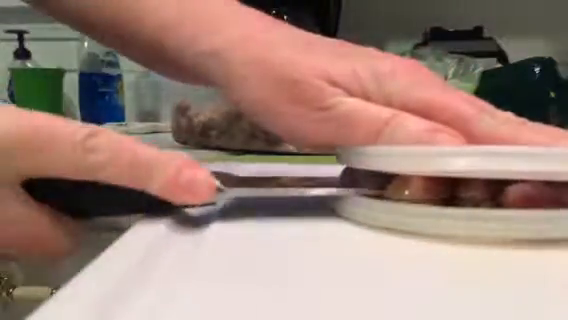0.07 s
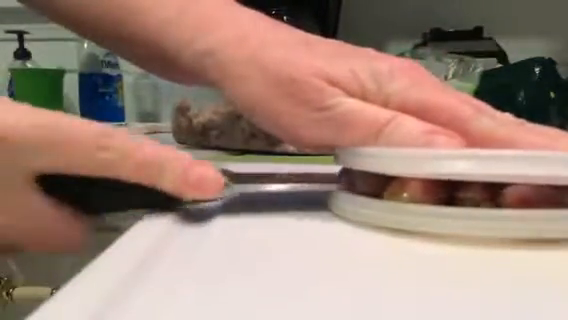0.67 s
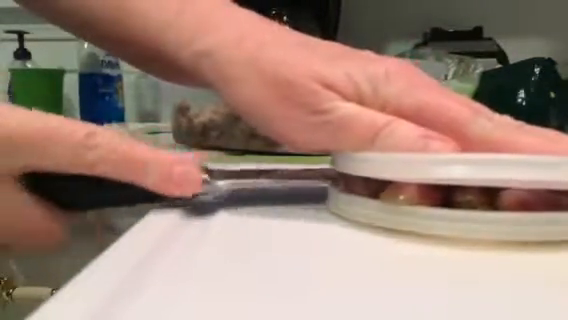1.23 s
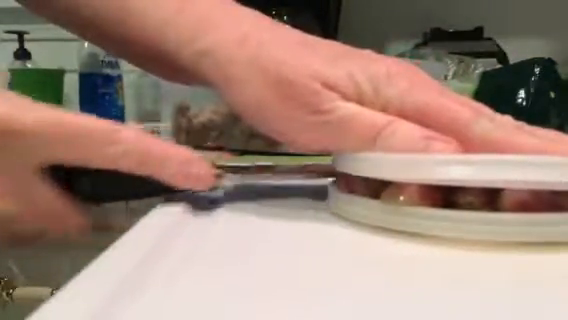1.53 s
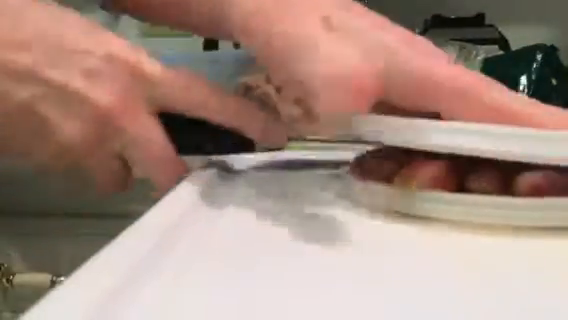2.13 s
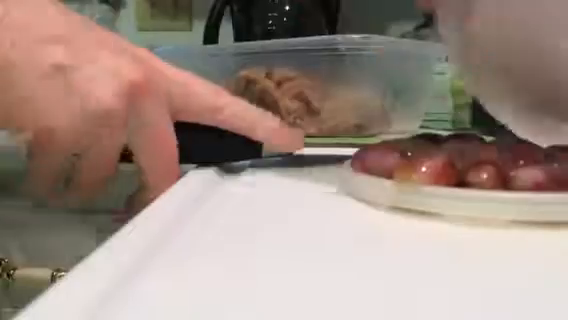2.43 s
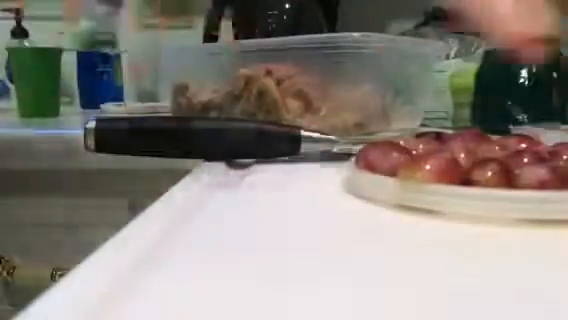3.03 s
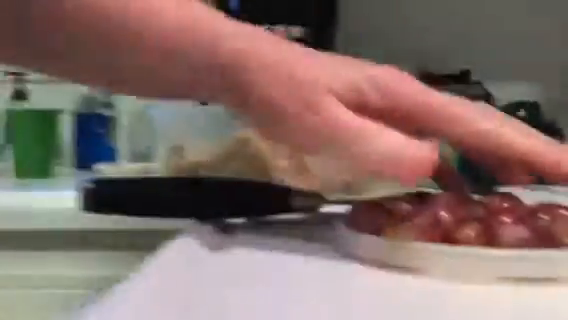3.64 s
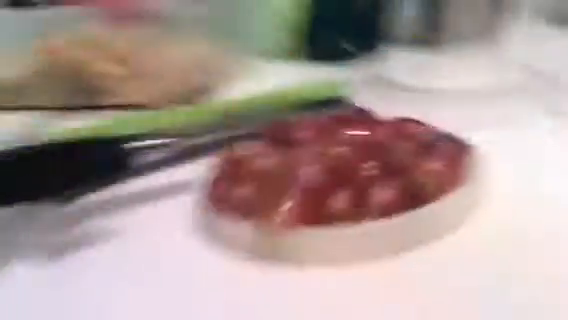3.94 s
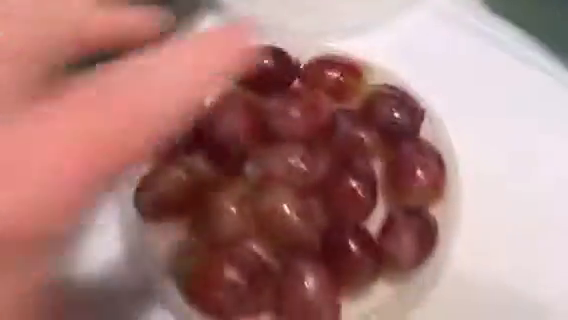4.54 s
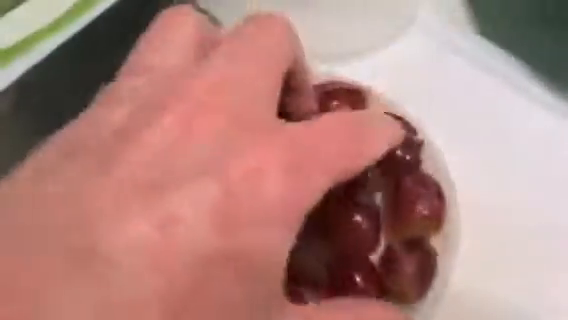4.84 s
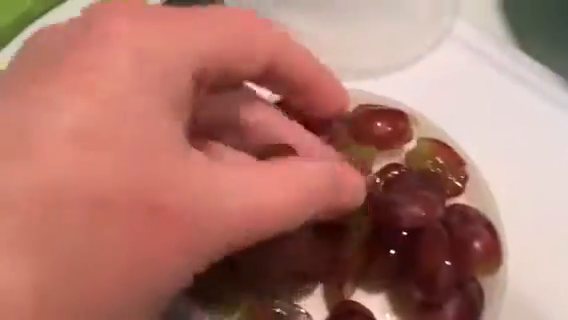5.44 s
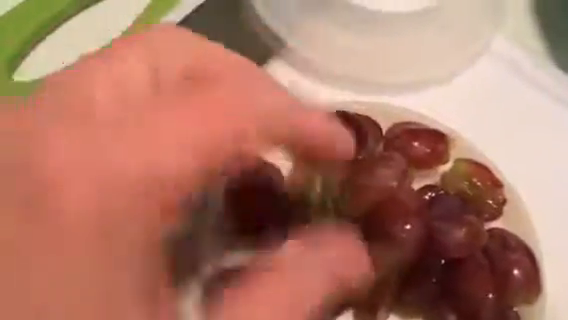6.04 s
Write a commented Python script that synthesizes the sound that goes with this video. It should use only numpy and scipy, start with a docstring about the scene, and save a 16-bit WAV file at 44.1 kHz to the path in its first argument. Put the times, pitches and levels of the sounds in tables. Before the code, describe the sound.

Close to the microphone in a small kitchen, a serrated knife saws quickly through grapes held between two plastic lids, hissing and rasping on the rims and bumping the cutting board. The blade snaps free and is laid down with a brief ring. The top lid clicks off, then drops with a loud rattle. Soft handling bumps and very faint wet squelches follow over a low fridge hum.

```python
"""In a kitchen, close to a phone, a serrated knife saws through grapes held between two plastic lids.
The teeth hiss and rasp on the rim, and most pushes bump the lids on the cutting board.
The blade comes free, rings and is laid down; the top lid is lifted off and dropped with a rattle.
Fingers then turn the wet halves over. The phone is picked up with soft bumps, and a fridge hums."""
import sys
import numpy as np
from scipy import signal
from scipy.fft import rfft, irfft, next_fast_len
from scipy.io import wavfile
from scipy.ndimage import uniform_filter1d

SR = 44100
rng = np.random.default_rng(int(sys.argv[2]) if len(sys.argv) > 2 else 0)


def generate_wav(signal):
    """Clip the signal to [-1, 1] and save it as 16-bit WAV at the path in sys.argv[1]."""
    frames = np.transpose(np.atleast_2d(signal))
    scaled = np.clip(frames, -1, 1) * 32767
    pcm = np.round(scaled).astype(np.int16)
    wavfile.write(sys.argv[1], SR, pcm)


N = 277389
TIME = np.arange(N) / SR

# tone colour of the kitchen air: pitch_hz, relative_db
AIR_COLOUR = [(15, -52.5), (25, -18.5), (43, -14), (86, -12.5), (133, -10.5), (169, -18), (246, -16),
              (274, -24), (2300, -36.5), (15500, -44.5)]
# tones of the fridge: pitch_hz, base_level_db
FRIDGE_TONES = [(58, -65), (119, -70), (138, -65), (241, -72)]
# how the hum changes as the phone turns: time_s, gain_db
FRIDGE_SWELL = [(0, -10), (4.2, -8.5), (5.3, 0), (5.52, 6), (6.2, -4)]
# saw strokes, push and pull in turn: start_s, level_db, rim_pressure_db
SAW_STROKES = [(.018, -33, -7.5), (.215, -33, -4), (.368, -30, -7), (.556, -34, -15.5), (.706, -31, -9.5),
               (.887, -33, -13.5), (1.038, -31, -5), (1.208, -37.5, -1.5), (1.353, -31.5, 0),
               (1.513, -37.5, -6), (1.648, -35, -6), (1.805, -43.5, -2)]
# tone colours of the cutting edge, the scraped rim and the lids: pitch_hz, relative_db
HISS_COLOUR = [(200, -31.5), (1000, -25), (3000, -15), (4500, 1), (6500, 5), (8400, 2), (10500, -6),
               (13000, -13.5), (15500, -23)]
RASP_COLOUR = [(1500, -32), (3100, -11.5), (3900, -3.5), (4600, -3), (5800, -16.5), (10000, -32)]
BODY_COLOUR = [(100, -23.5), (220, -9.5), (400, -16), (750, -4), (1150, -2), (1500, 3), (2000, 2.5),
               (2800, -2), (5000, -23), (10000, -45)]
# the rim squeaks on some pulls: start_s, length_s, level_db, first_pitch_hz
RIM_SQUEAKS = [(0.239, 0.08, -37, 639.3), (.561, 0.073, -45.5, 518)]
# dull blows on the board and counter: start_s, level_db, hardness_db
BOARD_BLOWS = [(.483, -33, -10.5), (.800, -33.5, -6), (1.126, -30.5, -8), (1.420, -33.5, -1),
               (1.545, -44.5, 4), (1.723, -35.5, -2), (2.054, -32, -10.5), (2.334, -23.5, -7),
               (2.782, -32.5, -8.5), (2.951, -48, 4), (3.03, -45, -6), (3.682, -50.5, 4.5)]
# modes (the tones a struck thing rings with) of board and lid: pitch_hz, relative_db, base_decay_s
BOARD_MODES = [(83.4, -1, 0.097), (105, 3.5, 0.067), (168, 2, .08), (217, -3.5, 0.041),
               (352.1, -13.5, 0.31)]
LID_MODES = [(1090, -7, 0.095), (1277, -8.5, .13), (1414, -6, 0.083), (1520, -4, .17), (1554, -4, .32),
             (1680, -4.5, .2), (1830, -10, 0.17), (2275, -9, 0.085), (3777, -12, .09)]
# clacks of the plastic lid: start_s, level_db, centre_hz
LID_CLACKS = [(1.884, -32, 2550), (2.282, -41.5, 6950), (2.334, -18.5, 1640), (2.347, -28.5, 1490),
              (2.461, -31, 3970), (2.4942, -19, 2180), (2.762, -29, 2380), (2.951, -23, 1830),
              (3.016, -13, 1900), (3.025, -14.5, 2220), (3.1057, -17, 1680), (3.1395, -25, 1590),
              (3.567, -48.5, 1550), (5.142, -47.5, 1500)]
# modes of the blade, struck on its edge or its flat: pitch_hz, edge_db, flat_db, base_decay_s
BLADE_MODES = [(4180, -23, -9.5, .12), (5260, -31, -13, .2), (6430, -17, 0, .22), (6870, -31.5, -6, 0.28),
               (7263, -1, -10, 0.4), (7620, -38, -5.5, 0.17), (8360, 1, -16.5, 0.36),
               (9700, -8.5, -7.5, 0.32), (11159, -12, -18, 0.23), (11850, -28.5, -4.5, 0.15),
               (12500, -26.5, -10.5, .2), (14510, -24.5, -19.5, .14)]
# the blade taps plastic: start_s, level_db, centre_hz, side (0 is the edge, 1 the flat)
BLADE_TAPS = [(1.918, -25.5, 2111, 0.054), (2.0711, -20, 5040, 0.62)]
# fingers and plastic slide, wet fruit squelches: start_s, length_s, level_db, centre_hz
SLIDES = [(2.119, .12, -32, 1250), (2.4, 2.13, -63, 1500), (2.477, 0.097, -44.5, 3400),
          (2.631, 0.15, -45, 1410), (2.765, 0.088, -46.5, 3250), (3.014, .17, -38.5, 2400),
          (3.259, 0.14, -64.5, 4970), (3.545, .16, -49, 1040), (3.67, .24, -54, 720),
          (4.882, 0.64, -64.5, 3980), (4.968, 0.062, -59, 5200), (5.035, .12, -56, 5400),
          (5.756, 0.062, -64.5, 5700)]
# bumps on the phone's case: start_s, level_db
CASE_BUMPS = [(3.601, -37), (3.68, -38), (3.724, -43)]
# the room's echo in three bands: low_hz, high_hz, level_db, decay_s
ECHO_BANDS = [(60.4, 540, -8, .54), (450, 3600, -15, .44), (4000, 8500, -16, .18)]

SAW_END_S, PUSH_REST_S, PULL_REST_S = 1.89, .02, .0044  # the hand rests after each stroke
BODY_DB, BODY_FOLLOW = -9, .39  # the lids beside the hiss, and their dB per dB of rim pressure
SQUEAK_RISE_HZ_PER_S = 5000
CONTACT_SPAN, RUB_SPAN = 2.08, 2.05  # noise reaches this factor below and above its centre
HELD_RING_DB, LOOSE_RING_DB, DROP_S = -29, -12, 3.01  # the lid rings louder as it drops
CHATTER_START_S, CHATTER_END_S, CHATTER_HZ, CHATTER_DB = 3.03, 3.17, 128.4, -29.5
FREE_RING_DB, LYING_RING_DB, KNIFE_THUMP_DB = -10.5, -20.5, -18  # compared with the blade's tap
SHIMMER_DB, SHIMMER_DECAY_S = -26, .16  # countless high modes of the blade
LANDING_S, LANDING_DB, LANDING_HZ, TIP_LAG_S = 2.1225, -14, 2275, .0033
BOUNCE_GAP_S, BOUNCE_DB, BOUNCE_LOSS_DB, BOUNCE_HZ, BOUNCE_DULLING = .014, -21, 1.5, 2900, .8
TOP_HZ = 15500


def amp(db):
    """Turn decibels into a number to multiply by."""
    return 10 ** (np.asarray(db) / 20)


def unit(x, seconds=None):
    """Scale to an average strength (rms) of 1, or to the energy of that held for so many seconds."""
    return x / np.sqrt(np.sum(x ** 2) / (len(x) if seconds is None else seconds * SR))


def clock(seconds):
    """The time of each sample, from zero."""
    return np.arange(int(seconds * SR)) / SR


def fade(t, decay_s):
    """Die away by 60 dB every decay_s seconds."""
    return np.exp(-np.log(1000) * t / decay_s)


def add(track, start, sound):
    """Mix a sound in at its start time."""
    i = max(int(start * SR), 0)
    track[i:i + len(sound)] += sound[:N - i]


def band(x, low_hz, high_hz, order=2):
    """Keep the part of a sound between two pitches."""
    high_hz = min(max(high_hz, 1.1 * low_hz), .48 * SR)
    return signal.sosfilt(signal.butter(order, [low_hz, high_hz], "band", fs=SR, output="sos"), x)


def colour(x, points):
    """Shape a sound's lows and highs to follow a tone colour table."""
    hz, db = np.transpose(points)
    size = next_fast_len(len(x))
    bins_hz = np.maximum(np.fft.rfftfreq(size, 1 / SR), 1)
    bass_cut = np.minimum(bins_hz / hz[0], 1) ** 2
    gain = amp(np.interp(np.log(bins_hz), np.log(hz), db))
    return unit(irfft(rfft(x, size) * bass_cut * gain, size)[:len(x)])


def flutter(length, size):
    """A random wobble, smoothed over size samples."""
    return unit(uniform_filter1d(rng.standard_normal(length), size=size))


def fridge_and_air():
    """Soft kitchen air, and a wavering fridge hum that grows as the phone turns toward it."""
    hum = np.zeros(N)
    times = np.linspace(0, TIME[-1], 40)
    for hz, db in FRIDGE_TONES:
        waver, drift = (np.interp(TIME, times, rng.standard_normal(len(times))) for _ in range(2))
        hum += np.sqrt(2) * amp(db + 3 * waver) * np.sin(2 * np.pi * hz * TIME + .81 * drift)
    swell_db = np.interp(TIME, *np.transpose(FRIDGE_SWELL))
    air = amp(-63) * colour(rng.standard_normal(N), AIR_COLOUR)
    return air + amp(swell_db) * hum


def grains(size, spread_db):
    """Rubbing is a crowd of tiny slips of uneven strength."""
    return rng.standard_normal(size) * amp(spread_db * np.clip(rng.standard_normal(size), -3, 3))


def hollow(x, db, decay_s):
    """Every point of contact makes the plastic ring briefly in its own way."""
    t = clock(decay_s)
    response = rng.standard_normal(len(t)) * fade(t, decay_s)
    ringing = signal.fftconvolve(x, response / np.linalg.norm(response))[:len(x)]
    return unit(x + amp(db) * ringing)


def sawing():
    """Strokes swell and die with the blade's speed: the edge hisses, the rim rasps, the lids join in."""
    out = np.zeros(N)
    turns = [row[0] for row in SAW_STROKES[1:]] + [SAW_END_S]
    for k, ((start, db, rim_db), turn) in enumerate(zip(SAW_STROKES, turns)):
        length = turn - start - (PULL_REST_S if k % 2 else PUSH_REST_S)
        t = clock(length)
        hiss, rasp, body = (hollow(colour(grains(len(t), spread_db=3.5), tone), db=-7, decay_s=.03)
                            for tone in (HISS_COLOUR, RASP_COLOUR, BODY_COLOUR))
        grip = amp(.99 * flutter(len(t), size=220))  # grape skins catch and let go
        lean = amp(2.2 * flutter(len(t), size=500))  # the blade presses unevenly on the rim
        speed = np.sin(np.pi * t / length)
        friction = hiss + lean * (amp(rim_db) * rasp + amp(BODY_DB + BODY_FOLLOW * rim_db) * body)
        add(out, start, amp(db) * speed ** 1.42 * grip * friction)
    return out


def squeaks():
    """The blade sticks and slips on the rim: a rough tone that climbs as the hand speeds up."""
    out = np.zeros(N)
    for start, length, db, first_hz in RIM_SQUEAKS:
        t = clock(length)
        hz = (first_hz + SQUEAK_RISE_HZ_PER_S * t) * (1 + .061 * flutter(len(t), size=50))
        sawtooth = np.cumsum(hz) / SR % 1
        slips = band(sawtooth, 1000, 3790, order=1) * amp(2 * flutter(len(t), size=60))
        add(out, start, amp(db) * unit(slips) * np.sin(np.pi * t / length))
    return out


def thud(hardness_db):
    """One blow on the board: a low boom, with more knock and rattle the harder the contact."""
    t = clock(.5)
    hz, mode_db, decay_s = np.transpose(BOARD_MODES)
    detune = 1 + .05 * rng.standard_normal((len(hz), 1))  # the pressing hand shifts the modes
    boom = amp(mode_db) @ (np.sin(2 * np.pi * hz[:, None] * detune * t) * fade(t, decay_s[:, None]))
    boom = unit(band(boom, 76, 990, order=3), seconds=.017)  # a small board gives no deep bass
    knock = unit(band(fade(t, .0051), 210, 1000), seconds=.0035)
    rattle = unit(band(rng.standard_normal(len(t)), 130, 680)) * fade(t, .17)
    return boom + amp(hardness_db) * (rattle - knock)


def board_thuds():
    """The lids bump the board, on most pushes of the saw and as they are handled."""
    out = np.zeros(N)
    for start, db, hardness_db in BOARD_BLOWS:
        add(out, start, amp(db) * thud(hardness_db))
    return out


def crack(low_hz, high_hz, decay_s, tail_db, tail_decay_s):
    """Hitting plastic gives a sharp snap, then a noisy tail of many short modes."""
    t = clock(.5)
    snap, tail = rng.standard_normal((2, len(t)))
    snap = unit(band(snap * fade(t, decay_s), low_hz, high_hz), seconds=.0024)
    return snap + amp(tail_db) * unit(band(tail, low_hz, high_hz)) * fade(t, tail_decay_s)


def ring(hz, db, decay_s, scatter_db):
    """Fading modes; every blow shares its energy among them a little differently."""
    t = clock(.5)
    gain = amp(db + scatter_db * rng.standard_normal(len(hz)))
    sign = rng.choice([-1, 1], len(hz))
    tones = np.sin(2 * np.pi * hz[:, None] * t) * fade(t, decay_s[:, None])
    return (sign * gain) @ tones * np.sqrt(2 / np.sum(gain ** 2))


def lid():
    """The top lid clicks as it is peeled off, then drops and chatters on its rim."""
    out = np.zeros(N)
    hz, mode_db, decay_s = np.transpose(LID_MODES)
    for start, db, centre_hz in LID_CLACKS:
        flex = 1 + .015 * rng.standard_normal(len(hz))  # bending retunes the lid for each clack
        ring_db = LOOSE_RING_DB if DROP_S < start < CHATTER_END_S else HELD_RING_DB
        snap = crack(centre_hz / CONTACT_SPAN, centre_hz * CONTACT_SPAN,
                     decay_s=.008, tail_db=-19, tail_decay_s=.11)
        ringing = amp(ring_db) * ring(hz * flex, mode_db, decay_s, scatter_db=.5)
        add(out, start, amp(db) * (snap + ringing))
    for start in np.arange(CHATTER_START_S, CHATTER_END_S, 1 / CHATTER_HZ):
        strength = amp(CHATTER_DB + 3 * rng.standard_normal()) * fade(start - CHATTER_START_S, .98)
        ringing = ring(hz, mode_db * 1.7, decay_s * .4, scatter_db=1)  # soft taps favour strong modes
        snap = crack(1450, 1750, decay_s=.017, tail_db=-22.5, tail_decay_s=.08)
        add(out, start + rng.uniform(0, .79) / CHATTER_HZ, strength * (ringing + snap))
    return out


def blade_tap(start, centre_hz, side):
    """Steel on plastic: a snap, the lid's answer and a ring that differs between edge and flat."""
    t = clock(.5)
    hz, edge_db, flat_db, decay_s = np.transpose(BLADE_MODES)
    rim_hz, rim_db, rim_decay_s = np.transpose(LID_MODES)
    mode_db = edge_db + side * (flat_db - edge_db)
    if start < LANDING_S:
        steel = amp(FREE_RING_DB) * ring(hz, mode_db, decay_s * .8, scatter_db=3)
        steel *= fade(np.maximum(start + t - LANDING_S, 0), .07)  # landing chokes the ring
    else:
        steel = amp(LYING_RING_DB) * ring(hz, mode_db, decay_s * .6, scatter_db=1.3)  # board mutes it
    rim = ring(rim_hz * .92, rim_db * .31, rim_decay_s * .35, scatter_db=2)  # held lid: low and short
    snap = crack(centre_hz / CONTACT_SPAN, centre_hz * CONTACT_SPAN,
                 decay_s=.022, tail_db=-17, tail_decay_s=.12)
    shimmer = unit(band(rng.standard_normal(len(t)), 8000, 15000)) * fade(t, SHIMMER_DECAY_S)
    return snap + amp(-11) * rim + steel + side * amp(SHIMMER_DB) * shimmer


def knife():
    """The blade snaps free of the rim, lands heel then tip, and bounces; its weight thumps the board."""
    out = np.zeros(N)
    for start, db, centre_hz, side in BLADE_TAPS:
        add(out, start, amp(db) * blade_tap(start, centre_hz, side))
        add(out, start, amp(db + KNIFE_THUMP_DB) * thud(hardness_db=-10.5))
    add(out, LANDING_S, amp(LANDING_DB + KNIFE_THUMP_DB) * thud(hardness_db=1.5))
    tip_s = LANDING_S + TIP_LAG_S
    for start in (LANDING_S, tip_s):
        add(out, start, amp(LANDING_DB) * blade_tap(start, LANDING_HZ, side=.95))
    return out + bounces(tip_s, count=4)


def rubs():
    """Fingers, plastic and wet fruit slide in short gritty strokes that swell and die away."""
    out = np.zeros(N)
    for start, length, db, centre_hz in SLIDES:
        t = clock(length)
        slips = grains(len(t), spread_db=5)
        edges_hz = centre_hz / RUB_SPAN, centre_hz * RUB_SPAN
        grit = unit(band(slips, *edges_hz)) + amp(-3.5) * unit(band(slips, *edges_hz, order=1))
        grip = amp(2.6 * flutter(len(t), size=260))
        swell = np.sin(np.pi * (t / length) ** .49) ** 1.3
        add(out, start, amp(db) * hollow(grit * grip, db=-6, decay_s=.01) * swell)
    return out


def bounces(landing_s, count):
    """The flat of the blade bounces, weaker and duller each time."""
    out = np.zeros(N)
    for k in range(count):
        start = landing_s + (k + 1) * BOUNCE_GAP_S
        tap = blade_tap(start, BOUNCE_HZ * BOUNCE_DULLING ** k, side=.97)
        add(out, start, amp(BOUNCE_DB - k * BOUNCE_LOSS_DB) * tap)
    return out


def phone_bumps():
    """As the phone is picked up, each soft push on its case gives a couple of deep vibrations."""
    out, t = np.zeros(N), clock(.031)
    for start, db in CASE_BUMPS:
        add(out, start, amp(db) * np.hanning(len(t)) * np.sin(2 * np.pi * 64 * t))
    return out


def room(x):
    """The small kitchen adds a smooth echo in which the bass hangs on longest."""
    t = clock(.7)
    build_up = 1 - np.exp(-t / .0072)
    response = 0
    for low_hz, high_hz, db, decay_s in ECHO_BANDS:
        tail = band(rng.standard_normal(len(t)), low_hz, high_hz) * fade(t, decay_s) * build_up
        response += amp(db) * tail * np.sqrt(2 * (high_hz - low_hz) / SR / np.sum(tail ** 2))
    return signal.fftconvolve(x, response)[:N]


def scene():
    """The work happens within arm's reach of one microphone, with the fridge behind it."""
    near = sawing() + squeaks() + board_thuds() + knife() + lid() + rubs()
    mono = near + room(near) + phone_bumps() + fridge_and_air()
    return np.array([mono, mono])


def record(dry):
    """The phone thins the deepest bass, dips a little near 3 kHz and cuts the highest treble."""
    thin = signal.sosfilt(signal.butter(2, 40, "high", fs=SR, output="sos"), dry)
    dipped = thin - .31 * band(thin, 2750, 3400, order=1)
    return signal.sosfilt(signal.ellip(10, .2, 70, TOP_HZ, fs=SR, output="sos"), dipped)


dry = scene()
out = record(dry)
generate_wav(out)
```